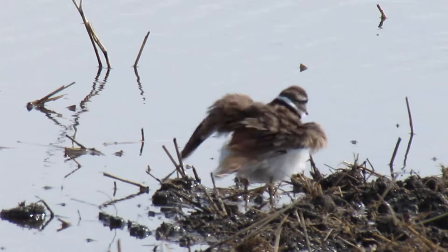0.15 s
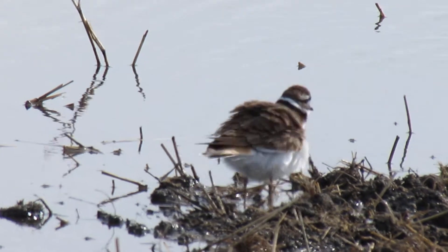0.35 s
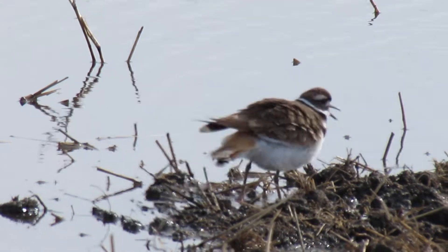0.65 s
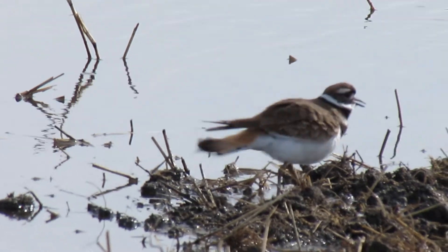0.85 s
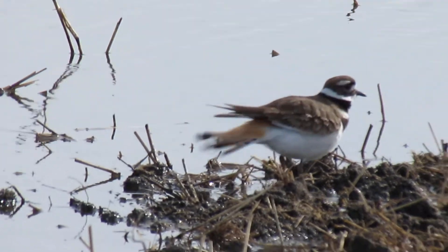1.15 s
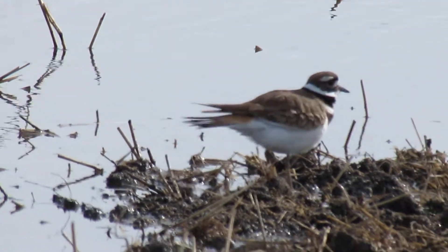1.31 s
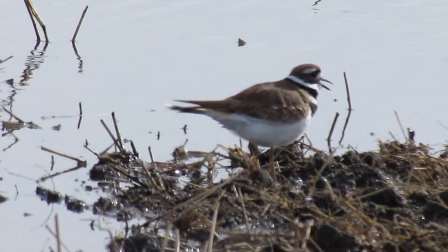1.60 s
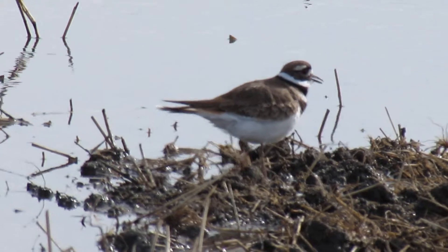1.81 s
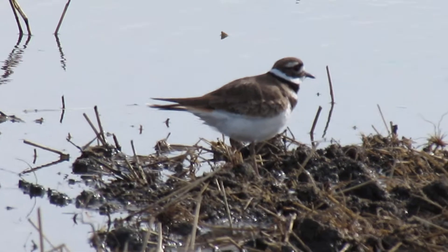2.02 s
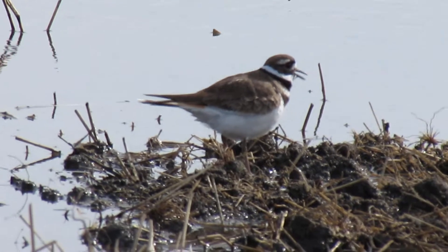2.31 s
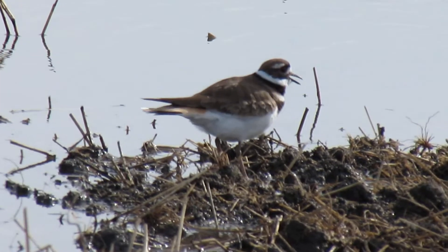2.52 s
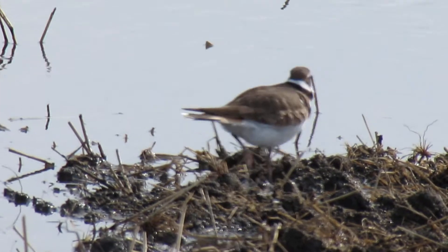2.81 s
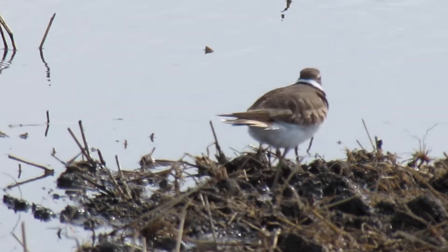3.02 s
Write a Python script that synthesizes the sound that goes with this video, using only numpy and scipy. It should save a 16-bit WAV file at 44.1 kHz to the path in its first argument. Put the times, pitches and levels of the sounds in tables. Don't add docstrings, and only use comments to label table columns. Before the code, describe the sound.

Two shorebirds trade shrill, piercing two-part calls over low wind rumble, with two camera clicks late

```python
import sys
import numpy as np
from scipy import signal
from scipy.fft import rfft, irfft
from scipy.io import wavfile
from scipy.ndimage import uniform_filter1d

SR = 44100
rng = np.random.default_rng(int(sys.argv[2]) if len(sys.argv) > 2 else 0)


def decibels_to_gain(level_db):
    exponent = np.asarray(level_db, float) / 20
    return 10 ** exponent


def generate_wav(signal):
    frames = np.transpose(np.atleast_2d(signal))
    scaled = np.clip(frames, -1, 1) * 32767
    pcm = np.round(scaled).astype(np.int16)
    wavfile.write(sys.argv[1], SR, pcm)


N = 138915

# time in seconds, pitch in Hz, level of the second harmonic in dB.
NEAR_KILL = [
    [(.488, 2155, -54), (.499, 2341, -34.5), (.509, 2280, -34), (.534, 1855, -52), (.64, 2007, -43),
     (.675, 1910, -45)],
    [(1.468, 2250, -55), (1.478, 2395, -34), (1.49, 2324, -32.5), (1.516, 1875, -50), (1.65, 2044, -41),
     (1.688, 1963, -49.5)],
    [(2.398, 2203, -78), (2.408, 2380, -33.5), (2.42, 2337, -33), (2.444, 1866, -50), (2.538, 1990, -42),
     (2.612, 2012, -45)],
]
# time in seconds, pitch in Hz, level of the second harmonic in dB.
NEAR_DEER = [
    [(.703, 2030, -66), (.708, 2085, -33.5), (.725, 2260, -35.5), (.745, 2169, -32), (.793, 2077, -32),
     (.868, 1828, -45.5), (.91, 1706, -51), (.948, 1675, -43), (.957, 1770, -90)],
    [(1.688, 2030, -46), (1.704, 2253, -38), (1.72, 2230, -39.5), (1.76, 2160, -39), (1.79, 2104, -41),
     (1.81, 1994, -43), (1.868, 1745, -51.5), (1.895, 1695, -61)],
    [(2.612, 2032, -42), (2.626, 2193, -36.5), (2.65, 2156, -39), (2.69, 2102, -35.5), (2.77, 1780, -47.5),
     (2.812, 1698, -55.5), (2.86, 1807, -49.5), (2.895, 1798, -48.5), (2.932, 1665, -60)],
]
NEAR_VOICE = [
    [-9.5, 0.13, -19, -21, -23, -32, -42.5],
    [-9, 1.05, -15, -18, -19.5, -26.5, -35.5],
]


def near_plover():
    return plover([NEAR_KILL, NEAR_DEER], NEAR_VOICE, flutter_db=1.2, pan_db=0,
                  echo_db=-20, scatter_db=-17.5, mud_db=-13)


# time in seconds, pitch in Hz, level of the second harmonic in dB.
FAR_KILL = [
    [(0.364, 2210, -53), (0.374, 2300, -49.5), (0.385, 2300, -52), (0.395, 2230, -49), (0.42, 1990, -49),
     (0.44, 1960, -52), (0.455, 1995, -50.5), (0.495, 2040, -43)],
    [(1.102, 2256, -50.5), (1.12, 2363, -41), (1.154, 2046, -50.5), (1.164, 1966, -45.5),
     (1.246, 2139, -45), (1.28, 2114, -65)],
    [(1.733, 2237, -50), (1.748, 2282, -38), (1.77, 2042, -44), (1.785, 1970, -40), (1.802, 2028, -43.5),
     (1.83, 2075, -40.5), (1.86, 2093, -41), (1.872, 2080, -47)],
    [(2.476, 2240, -51), (2.494, 2332, -39), (2.534, 1991, -50.5), (2.618, 2089, -38), (2.63, 1960, -52),
     (2.657, 2100, -56)],
    [(2.93, 2191, -43), (2.948, 2340, -42), (3.002, 1987, -43.5), (3.056, 2022, -42.5), (3.092, 1976, -50),
     (3.102, 1910, -75)],
]
# time in seconds, pitch in Hz, level of the second harmonic in dB.
FAR_DEER = [
    [(0.0, 2033, -55), (0.012, 2002, -46), (0.03, 1893, -58), (0.036, 1790, -72)],
    [(0.55, 1950, -47), (0.576, 2208, -47), (0.622, 2128, -46.5), (0.684, 1702, -61), (0.7, 1790, -62)],
    [(1.323, 1925, -51), (1.349, 2277, -47.5), (1.409, 2242, -46.5), (1.449, 1996, -46), (1.493, 1580, -55)],
    [(1.938, 1914, -53.5), (1.964, 2258, -46), (2.05, 2227, -44), (2.1, 1967, -45), (2.14, 1604, -59)],
    [(3.132, 1870, -69), (3.144, 1930, -39), (3.15, 2170, -41)],
]
# time in seconds, pitch in Hz, level in dB.
LINGERING_CALL = [
    [(-.01, 2160, -50), (.06, 2104, -81), (.22, 2150, -82)],
    [(.02, 1900, -51), (.05, 1715, -68.5), (.095, 1660, -75)],
]
FAR_VOICE = [
    [-13, 0.11, -19.5, -24.5, -41, -45, -65],
    [-10, 2.8, -16.5, -27, -42, -51, -55],
]


def far_plover():
    return plover([FAR_KILL, FAR_DEER + LINGERING_CALL], FAR_VOICE, flutter_db=3, pan_db=-2.7,
                  echo_db=-22, scatter_db=-10, mud_db=-0.5)


# frequency in Hz, share of the sound.
CAMERA_BOUNCE = [(1500, 0.037), (3000, 0.59), (4000, 0.18), (4700, 1), (6000, 0.046), (9300, 0.6),
                 (14000, 0.41)]


def plover(syllables, voices, flutter_db, pan_db, echo_db, scatter_db, mud_db):
    lifts_db = [0.96, 0.5]
    wobble = 1 + 0.00118 * drift(30.0)
    flutter = [decibels_to_gain(flutter_db * drift(39)) for _ in voices[0]]
    calls = np.zeros(N)
    for notes, voice_db, lift_db in zip(syllables, voices, lifts_db):
        for note in notes:
            calls += syllable(note, voice_db, lift_db, wobble, flutter)
    hz = np.arange(N // 2 + 1) * SR / N
    bounce_s = 0.0010695
    bounce = irfft(rfft(calls) * at_hz(CAMERA_BOUNCE, hz)[0] * np.exp(-2j * np.pi * hz * bounce_s), N)
    direct = (calls + bounce * [[1], [-1]]) * left_right(pan_db)
    return direct + shore(calls, echo_db, scatter_db, mud_db)


def syllable(note, voice_db, lift_db, wobble, flutter):
    glide_s, edge_s, mid_pitch_hz = 0.013, 0.0038, 2187
    effort, loud_db = 0.013, -40
    t = np.arange(N) / SR
    s, hz, db = np.transpose(note)
    pitch = uniform_filter1d(np.interp(t, s, hz), size=int(glide_s * SR))
    level_db = np.interp(t, s, db)
    lift = decibels_to_gain(lift_db * (pitch - mid_pitch_hz) / 100)
    phase = 2 * np.pi * np.cumsum(pitch * wobble) / SR
    stack = np.zeros(N)
    for number, harmonic_db in enumerate(voice_db, start=1):
        effort_db = effort * max(number - 2, 0) * (level_db - loud_db)
        lift_power = 1 if number == 1 else (number - 2) / 2
        throat_gain = throat(number * pitch[::64]).repeat(64)[:N]
        gain = decibels_to_gain(harmonic_db + effort_db) * lift ** lift_power * throat_gain * flutter[number - 1]
        stack += gain * np.sin(number * phase + (number - 1) ** 2)
    gate = np.clip(np.minimum(t - s[0], s[-1] - t) / edge_s + 0.5, 0, 1) ** 2
    return np.sqrt(2) * gate * decibels_to_gain(level_db) * stack


# frequency in Hz, width in Hz, gain in dB.
THROAT = [(1660, 520, -1.5), (5330, 290, 11.5), (6100, 260, -1), (7670, 260, -3), (9000, 570, 5.5),
          (10870, 730, -4.5), (12960, 860, 9), (15810, 990, -20)]


def throat(hz):
    total_db = sum(db * np.exp(-((hz - centre_hz) / width_hz) ** 2) for centre_hz, width_hz, db in THROAT)
    return decibels_to_gain(total_db)


def shore(calls, echo_db, scatter_db, mud_db):
    t = np.arange(SR // 2) / SR
    reeds = decibels_to_gain(-60 * t / 0.29) * (t > 0.003)
    mud = decibels_to_gain(-60 * t / 0.082) * (t > 0.003)
    bank = np.exp(-((t - 0.159) / 0.02) ** 2)
    distant = decibels_to_gain(scatter_db) * unit_energy(reeds) + decibels_to_gain(echo_db) * unit_energy(bank)
    close = decibels_to_gain(mud_db) * unit_energy(mud)
    paths = np.zeros((2, len(t)))
    for shape, cut_hz in ((distant, 7800), (close, 9600)):
        dull = signal.butter(2, cut_hz, fs=SR, output="sos")
        paths += signal.sosfilt(dull, shape * rng.standard_normal((2, len(t))))
    return signal.fftconvolve(calls[None], paths, axes=1)[:, :N]


# start in seconds, peak in dB, brightness from 0 to 1, left over right in dB.
CLICKS = [
    (2.0622, -20, 0.73, 8),
    (2.0648, -12.5, 0.88, -0.5),
    (2.2541, -16.5, 0.27, 1),
    (2.384, -33, 0.05, 0),
]
# start in seconds, peak in dB.
TICKS = [
    (.011, -48),
    (.033, -51),
    (.087, -56),
]


def camera():
    clicks, t = np.zeros((2, N + SR)), np.arange(SR // 5) / SR
    for s, db, bright, pan_db in CLICKS:
        i = int(s * SR)
        clicks[:, i:i + len(t)] += decibels_to_gain(db) * left_right(pan_db) * click(t, bright)
    for s, db in TICKS:
        i = int(s * SR)
        sharp_noise = np.diff(rng.standard_normal(len(t) + 2), 2)
        clicks[:, i:i + len(t)] += decibels_to_gain(db - 60 * t / 0.005) * sharp_noise
    return clicks[:, :N]


# frequency in Hz, level in dB, seconds to fade by 60 dB.
SHELL = [(321, -8.5, 0.068), (680, -10, 0.049), (886, -8, .035), (1450, 0.5, 0.028), (1920, 0.5, 0.022),
         (2810, -4, 0.011), (4130, -4.5, 0.012), (5480, 3.5, 0.0071), (9240, 0.5, 0.0059)]


def click(t, bright):
    crack = decibels_to_gain(-3 - 60 * t / 0.022) * bright ** 2 * rng.standard_normal((2, len(t)))
    hit = signal.lfilter(*signal.butter(1, 7900, fs=SR), crack)
    knock = decibels_to_gain(6.5 - 60 * t / 0.091 / bright) * bright * rng.standard_normal((2, len(t)))
    hit += signal.sosfilt(signal.butter(3, [122, 950], "band", fs=SR, output="sos"), knock)
    rattle_s = 0.002
    for hz, mode_db, t60 in SHELL:
        for late, turn in rng.random((3, 2, 2, 1)):
            since = np.maximum(t - late ** 2 * rattle_s * bright, 0)
            fade = decibels_to_gain(mode_db - 60 * since / t60 / bright ** 0.5) * bright ** (hz / 3000)
            hit += 0.35 * fade * np.sin(2 * np.pi * hz * since) * np.sign(turn - 0.5)
    return hit


# frequency in Hz, level in dB per Hz.
RUMBLE = [(12, -37), (20, 3.5), (80, -1.5), (136, -4.5), (188, -3), (424, -5.5), (619, -13), (990, -18),
          (1500, -22.5), (1950, -26.5), (3300, -120)]
# frequency in Hz, level in dB per Hz.
HISS = [(880, -32), (1500, -1), (2920, -9), (4310, -14), (4890, -14.5), (15500, -23.5)]
# frequency in Hz, width in Hz, level at the start in dB, level at the end in dB.
DRONE = [(91, 1.32, -46, -61.5), (112, 6.3, -58.5, -51.5), (193.3, 7.7, -57, -48.5)]


def background():
    seam_hz = 1500

    def rumble_power(hz):
        return decibels_to_gain(2 * at_hz(RUMBLE, hz)[0]) * (hz > 10) * (hz < seam_hz)

    def hiss_power(hz):
        return decibels_to_gain(2 * at_hz(HISS, hz)[0]) * (hz >= seam_hz)

    out = decibels_to_gain(-42.5 - 0.66 * drift(0.17)) * port_noise(rumble_power)
    out += decibels_to_gain(-61) * port_noise(hiss_power)
    for centre_hz, width_hz, first_db, last_db in DRONE:
        def engine_power(hz):
            return 1 / (1 + (2 * (hz - centre_hz) / width_hz) ** 2) ** 2
        out += decibels_to_gain(np.linspace(first_db, last_db, N)) * port_noise(engine_power)
    return out


def port_noise(power):
    pair = ports(rng.standard_normal((2, N)), power)
    return pair / np.std(pair.mean(axis=0))


# frequency in Hz, likeness from 0 to 1, left lag in radians, left over right in dB.
PORTS = [(30.6, 0, 2.2, 6.5), (158, 0.97, 1.04, -1.4), (440, 0.88, 1.2, 1), (472, 0.96, 1.27, 8),
         (774, 0.3, 4.1, -7), (1102, 0.67, 6.9, -7), (1470, 0.53, 9.6, -3), (2220, 0, 11.85, -4.5),
         (16100, 0, 15, 1.8)]


def ports(pair, power=lambda hz: 1):
    hz = np.arange(N // 2 + 1) * SR / N
    alike, lag, pan_db = at_hz(PORTS, hz)
    alike = np.clip(alike, 0, 1)
    shared, other = rfft(pair) * np.sqrt(power(hz))
    left = (alike * shared + np.sqrt(1 - alike ** 2) * other) * np.exp(-1j * lag)
    return irfft([left * decibels_to_gain(pan_db / 2), shared * decibels_to_gain(-pan_db / 2)], N)


def left_right(pan_db):
    return decibels_to_gain([[pan_db / 2], [-pan_db / 2]])


def unit_energy(shape):
    return shape / np.linalg.norm(shape)


def at_hz(points, hz):
    f, *columns = np.transpose(points)
    return [np.interp(np.log(hz + 1), np.log(f), column) for column in columns]


def drift(rate_hz):
    r = np.exp(-2 * np.pi * rate_hz / SR)
    slow = signal.lfilter([1], [1, -2 * r, r * r], rng.standard_normal(N + SR))[SR:]
    return slow / np.sqrt(np.mean(slow ** 2) + 1e-20)


def scene():
    return near_plover() + far_plover() + ports(camera()) + background()


def low_pass(x):
    return signal.sosfilt(signal.butter(12, 15830, fs=SR, output="sos"), x)


def record(dry):
    dry = signal.sosfilt(signal.butter(3, 39, "high", fs=SR, output="sos"), dry)
    mix = signal.sosfilt(signal.cheby2(20, 70, 16150, fs=SR, output="sos"), dry)
    return low_pass(mix)


dry = scene()
out = record(dry)
generate_wav(out)
```